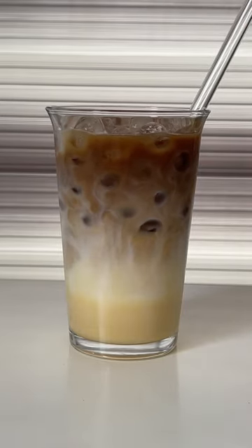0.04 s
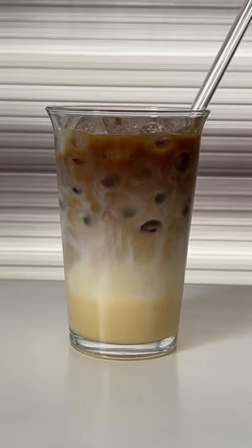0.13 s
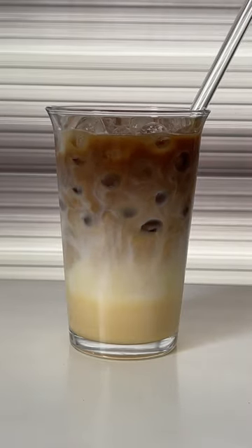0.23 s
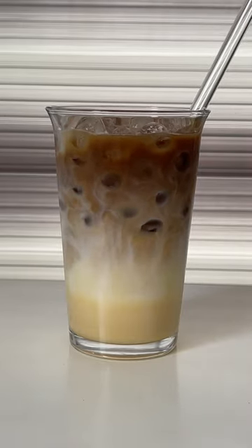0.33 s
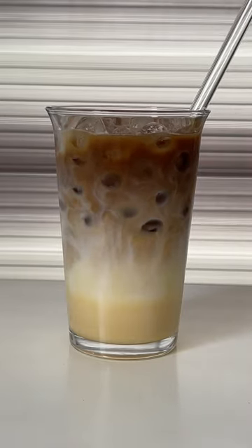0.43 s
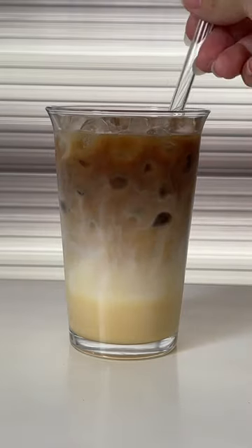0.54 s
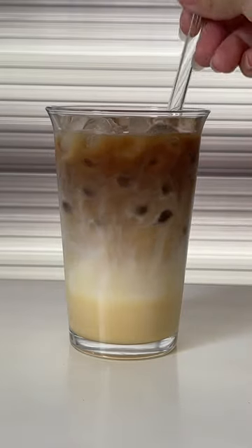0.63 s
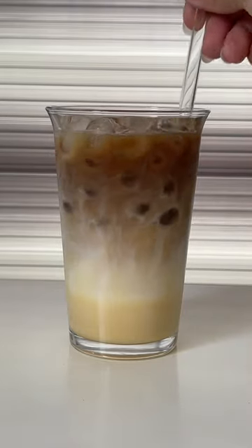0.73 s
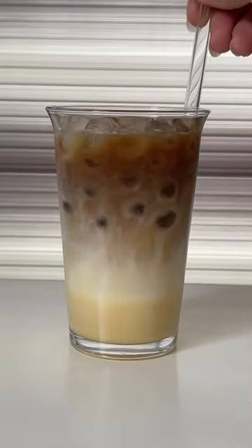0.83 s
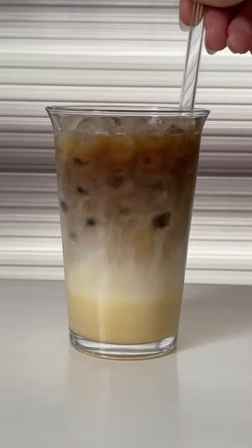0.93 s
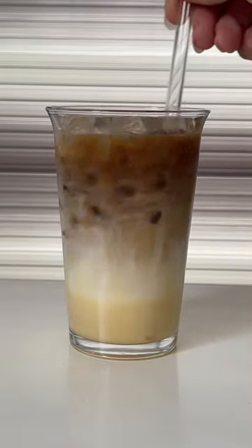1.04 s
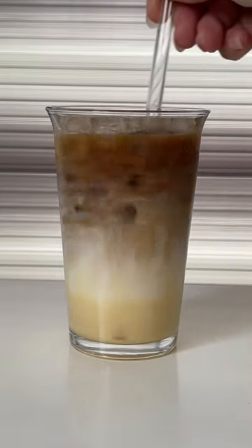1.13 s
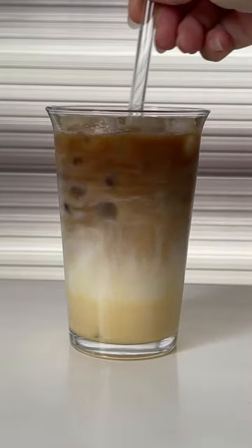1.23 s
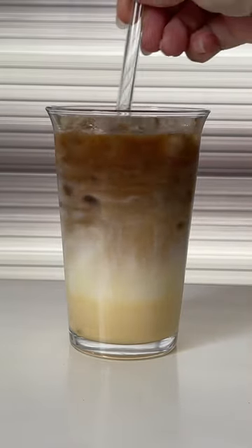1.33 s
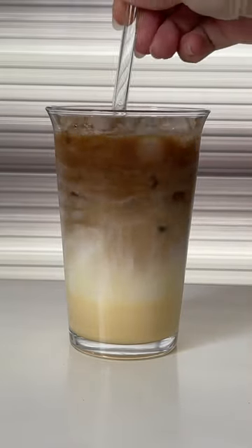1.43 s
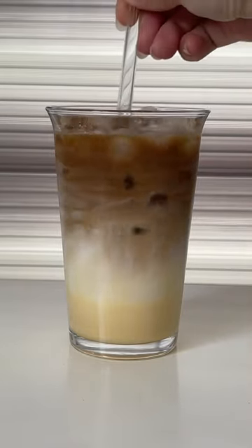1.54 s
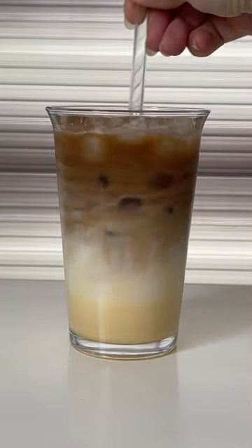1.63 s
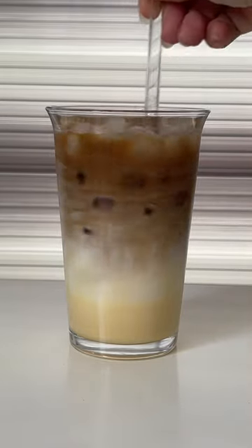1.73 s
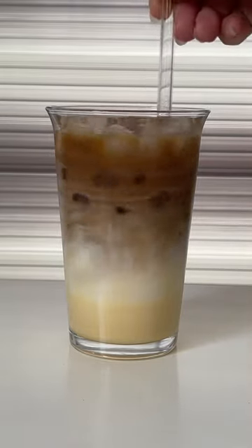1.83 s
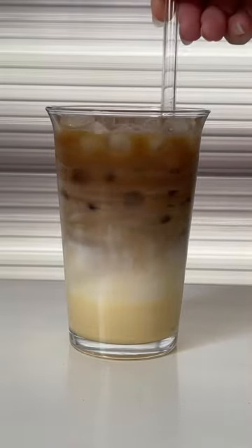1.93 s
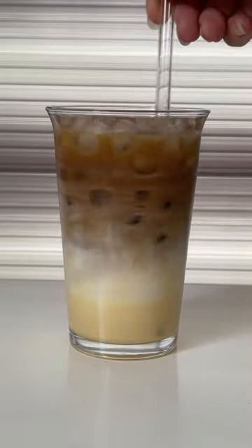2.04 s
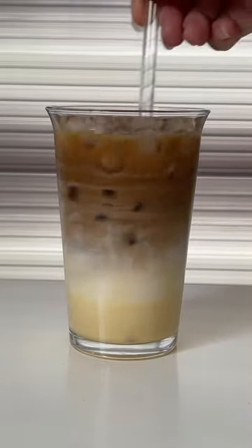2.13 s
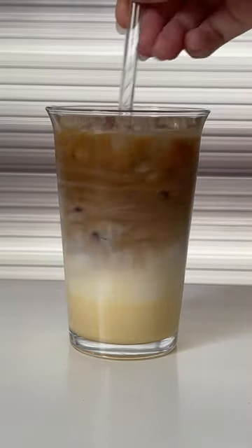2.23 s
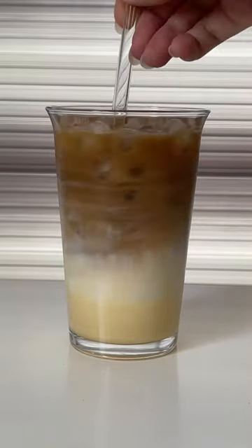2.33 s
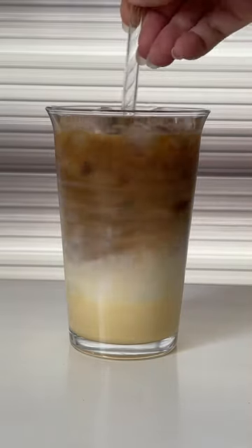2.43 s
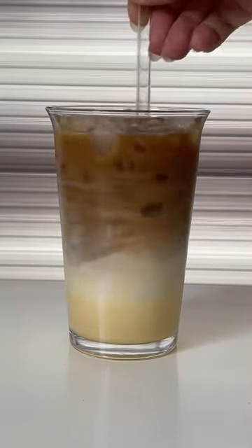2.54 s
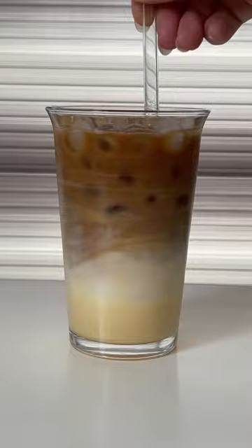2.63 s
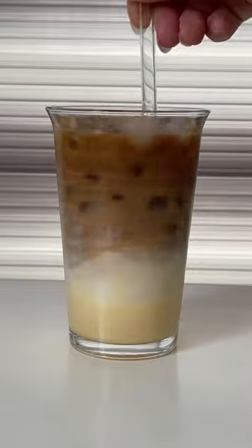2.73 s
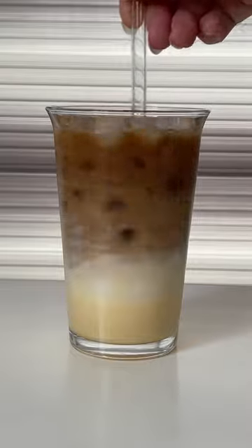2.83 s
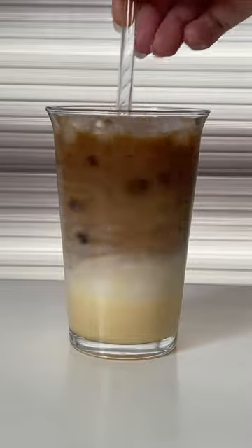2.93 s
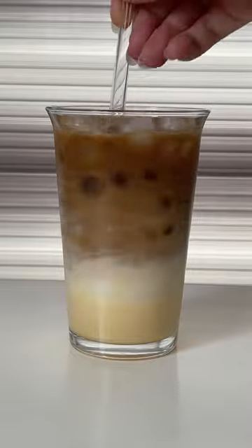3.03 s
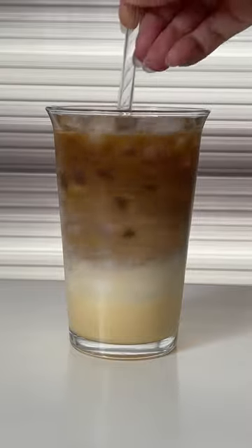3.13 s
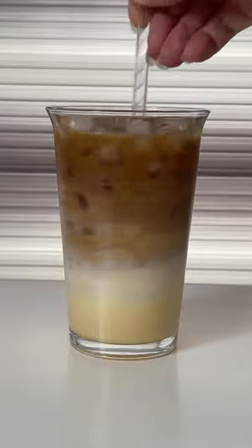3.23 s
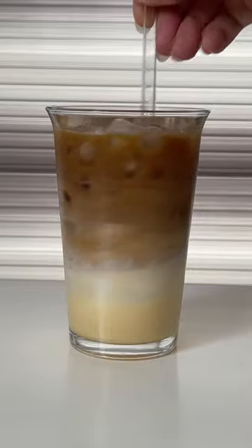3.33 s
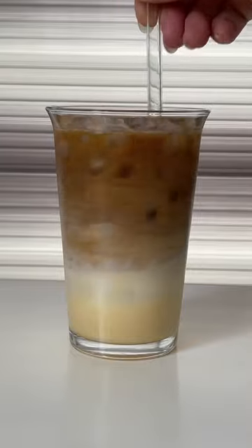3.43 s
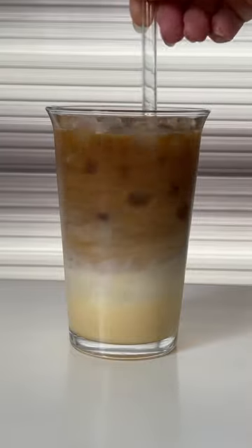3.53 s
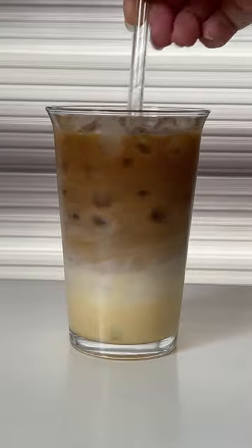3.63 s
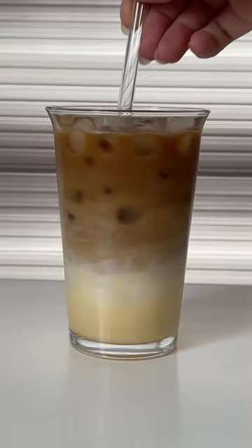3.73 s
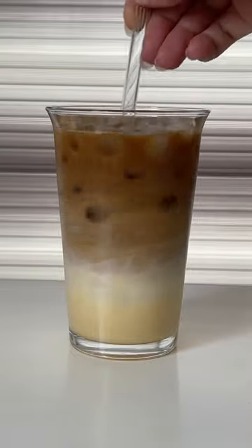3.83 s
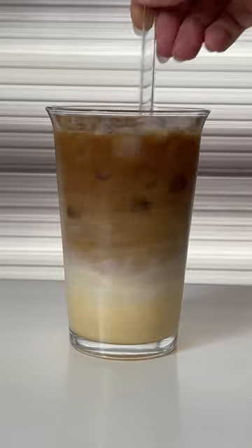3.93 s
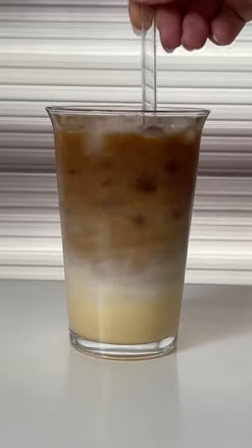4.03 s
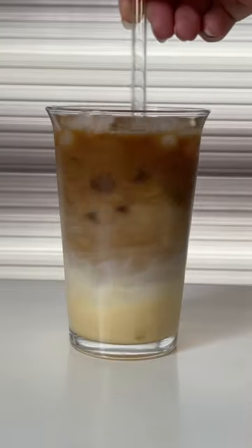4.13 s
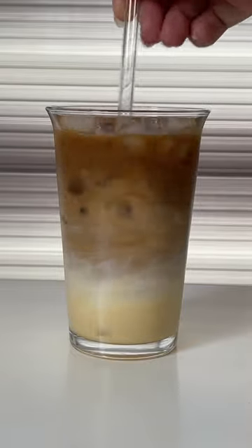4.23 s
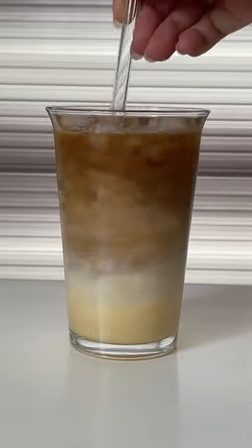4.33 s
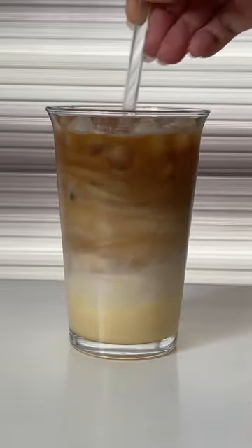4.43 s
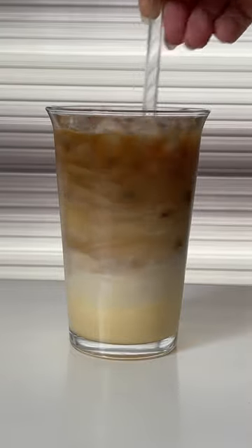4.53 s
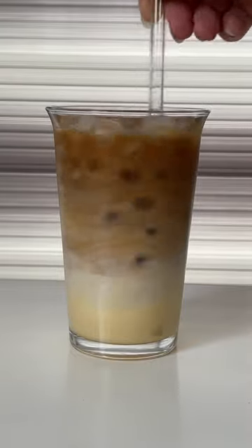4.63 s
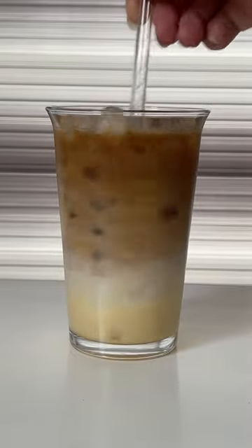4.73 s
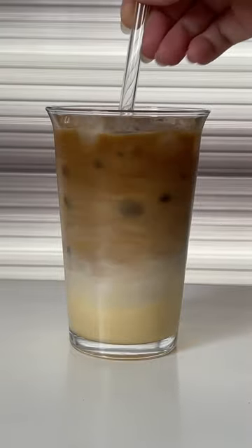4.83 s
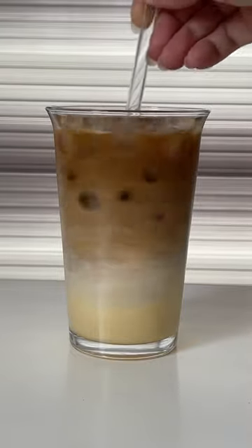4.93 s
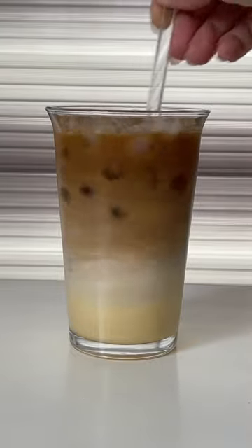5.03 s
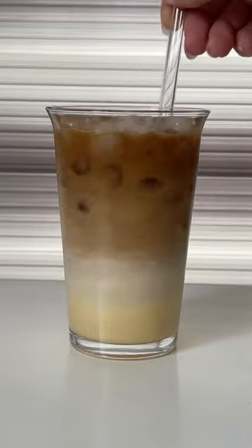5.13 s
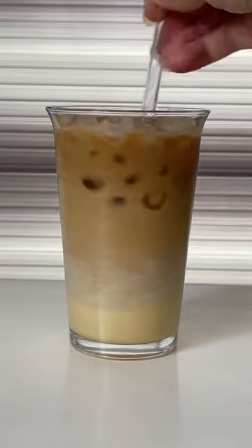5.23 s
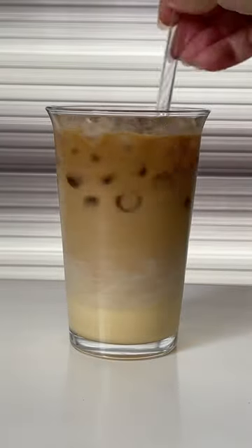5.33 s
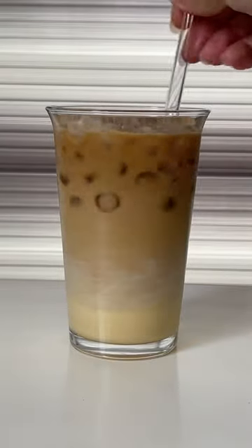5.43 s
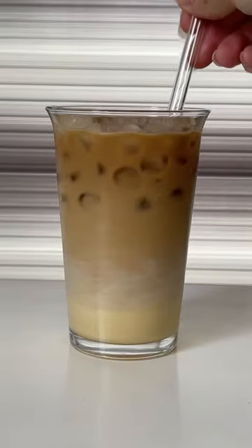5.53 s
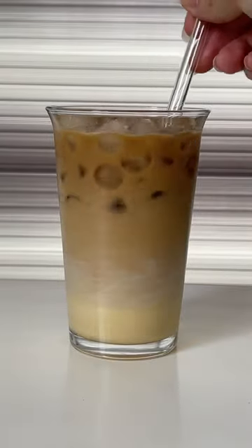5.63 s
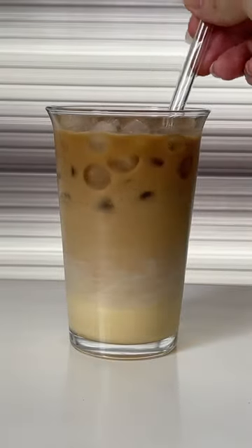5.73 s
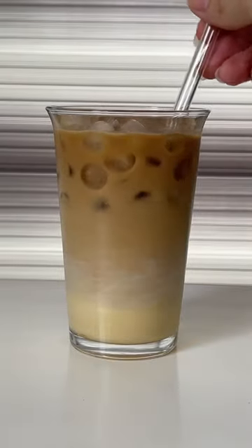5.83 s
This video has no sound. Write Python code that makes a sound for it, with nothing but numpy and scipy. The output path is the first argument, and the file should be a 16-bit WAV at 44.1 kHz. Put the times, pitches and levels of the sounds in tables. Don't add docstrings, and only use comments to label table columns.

```python
import sys
import numpy as np
from scipy import signal
from scipy.fft import rfft, irfft, next_fast_len
from scipy.io import wavfile
from scipy.ndimage import uniform_filter1d

SR = 44100
rng = np.random.default_rng(int(sys.argv[2]) if len(sys.argv) > 2 else 0)


def how_loud(loudness_db):
    steps = np.asarray(loudness_db, float) / 20
    return 10 ** steps


def put_to_file(sound):
    columns = np.atleast_2d(sound).T
    safe = np.clip(columns, -1, 1)
    whole_steps = np.round(safe * 32767)
    wavfile.write(sys.argv[1], SR, whole_steps.astype(np.int16))


N = 260190
TIME = np.arange(N) / SR


def evened(x):
    return x / np.sqrt(np.mean(x ** 2) + 1e-20)


def read(points, hz):
    f, value = np.transpose(points)
    return np.interp(np.log(hz + 1), np.log(f + 1), value)


def add(mix, s, sound):
    part = mix[round(s * SR):][:len(sound)]
    part += sound[:len(part)]


def noise(points, channels=1):
    size = next_fast_len(N)
    colour = how_loud(read(points, np.fft.rfftfreq(size, 1 / SR)))
    white = rng.standard_normal((channels, size))
    return evened(irfft(rfft(white) * colour, size)[:, :N])


def hard(x, hz=1250):
    return signal.sosfilt(signal.butter(3, hz, "high", fs=SR, output="sos"), x)


def ring(hz, db, t60, size=2600):
    t = np.arange(size) / SR
    swell = 1 - np.exp(-t * hz / 1.3)
    return how_loud(db - 60 * t / t60) * swell * np.sin(2 * np.pi * hz * t)


def struck(modes, count, detune=0.011):
    out = 0
    for hz, db, t60 in modes:
        pitch, weight, damping = rng.standard_normal((count, 3)).T[:, :, None]
        out = out + ring(hz * (1 + detune * pitch), db + 3.2 * weight, t60 * np.exp(.25 * damping))
    return out


# (frequency [Hz], level [dB], decay t60 [s])
ICE = [(2250, -6, .005), (2750, -3, .005), (3300, -2, .004), (3800, -4, .004), (4480, -4, .007),
       (5250, -5, .005)]


def ice(hz, body, t60):
    out = ring(hz[:, None], 0, t60) + body * struck(ICE, len(hz), 0.064)
    out[:, 0] += 0.6
    return out


def knocks(when, levels_db, rings):
    lead = .006
    out, t = np.zeros(N), np.arange(1300) / SR - lead
    shape = (len(when), len(t))
    grit, chance, size = rng.standard_normal(shape), rng.random(shape), rng.standard_normal(shape)
    contact = 0.16 * grit * np.exp(np.minimum(t / 0.00015, -t / 0.001))
    contact[:, round(lead * SR)] += 1
    grazes = (chance < 700 / SR) * size
    contact = hard(contact + 0.17 * grazes * np.exp(np.minimum(t / 0.00037, -t / 0.005)))
    for group, db in zip(rings, levels_db):
        sounds = signal.fftconvolve(group[:, :1800], contact, axes=1)
        for s, level_db, sound in zip(when, db, sounds):
            add(out, s - lead + 0.00033, how_loud(level_db) * sound / abs(sound).max())
    return out


# (frequency [Hz], density [dB per Hz])
AIR = [(65, -34), (110, -12.5), (380, -18.5), (484, -23.5), (591, -25.5), (3440, -41), (4730, -42.5),
       (13100, -34.5)]
AIR_DB = -77


def air():
    ports = noise(AIR, channels=2)
    return how_loud(AIR_DB) * (ports[0] + .3 * ports)


# (time [s], level [dB])
RUMBLE = [(0.0, -72.5), (1.31, -75), (1.48, -64), (1.56, -71.5), (4.34, -74), (4.58, -54.5), (4.67, -66),
          (4.91, -53), (5.6, -72.5), (5.65, -62.5), (5.9, -74)]


def rumble():
    low = noise([(15, -57), (30, -36), (40, 7.5), (58, 7.0), (90, 1.0), (150, -9.5), (300, -30.5)])[0]
    s, db = np.transpose(RUMBLE)
    return low * how_loud([[-.4], [.4]]) * how_loud(np.interp(TIME, s, db))


# (time [s], level [dB], start frequency [Hz], end frequency [Hz])
TICK = (0.417, -49, 11300, 7600)


def tick():
    s, db, from_hz, to_hz = TICK
    out, hz = np.zeros(N), np.geomspace(from_hz, to_hz, 420)
    chirp = np.sin(2 * np.pi * np.cumsum(hz) / SR)
    add(out, s, how_loud(db) * np.hanning(420) * chirp * rng.uniform(0.78, 1, 420))
    return out


# (peak time [s], jostle level [dB], rise [s], fall [s]), rise and fall over SWING_DB
STROKES = [(.5, -52, .02, 0.028), (.88, -62, 0.59, 0.13), (1.33, -72, 0.057, 0.33),
           (1.602, -47, 0.43, 0.14), (1.86, -58, 0.39, 0.13), (2.22, -51, 0.16, 0.29),
           (2.56, -57, 0.12, 0.067), (2.803, -55.5, 0.16, 0.077), (3.2, -53, 0.23, 0.24),
           (3.62, -58, 0.15, 0.19), (3.919, -47.5, 0.14, 0.26), (4.52, -45, 0.2, 0.21),
           (5.08, -45.5, 0.28, 0.15), (5.36, -53, 0.19, 0.041), (5.7, -59.5, 0.29, 0.19)]
SWING_DB, REST_DB = 10, -97
ROUND = 2.3


def stir_db():
    t = np.arange(0, N + 64, 64) / SR
    power = how_loud(2 * REST_DB)
    for s, db, rise, fall in STROKES:
        away = np.maximum((s - t) / rise, (t - s) / fall)
        power = power + how_loud(2 * (db - SWING_DB * away ** ROUND))
    return np.interp(TIME, t, 10 * np.log10(power))


BRIGHTEN = 0.24


def jostle(per_s=750, spread_db=6.0):
    kinds = 24
    bumps = rng.exponential(1, N)
    size = how_loud(spread_db * np.minimum(bumps, 2.4)) * (rng.random(N) < per_s / SR)
    kind = rng.integers(0, kinds, N)
    taps = how_loud(-4.5) * struck(RIM, kinds) + how_loud(-6.5) * struck(STRAW, kinds)
    taps += how_loud(-8.5) * struck(WALL, kinds, 0.0893) + how_loud(0.5) * struck(ICE, kinds, 0.04)
    taps[:, 0] += 3.0
    contact = hard(rng.standard_normal((kinds, 200)) * np.exp(-((np.arange(200) - 60) / 9) ** 2))
    taps = signal.fftconvolve(taps[:, :1500], contact, axes=1)
    taps /= np.linalg.norm(taps, axis=1)[:, None]
    out = sum(signal.oaconvolve(size * (kind == k), taps[k])[:N] for k in range(kinds))
    slow = np.sqrt(uniform_filter1d(out ** 2, 7000) + 1e-12)
    treble, level_db = hard(out, hz=2600), stir_db()
    out = out + treble * (how_loud(BRIGHTEN * (level_db + 51.5)) - 1)
    return out / slow * how_loud(level_db) * how_loud(1.5)


# (frequency [Hz], density [dB per Hz])
SLOSH = [(53, -51), (90, -17.5), (184, -5), (333, -10.5), (442, -4.5), (610, -15.5), (950, -14.5),
         (1300, -6.5), (2200, -120)]
SLOSH_DB, SLOSH_FOLLOWS = -65.5, 0.81


def slosh():
    lumps = how_loud(3.0 * evened(uniform_filter1d(rng.standard_normal(N), 900)))
    common, apart = noise(SLOSH, channels=2)
    ports = common + 0.36 * np.outer([1, -1], hard(apart, hz=150))
    level_db = SLOSH_DB + SLOSH_FOLLOWS * (stir_db() + 59.0)
    return how_loud(-4.5) * ports * lumps * how_loud(level_db)


# (frequency [Hz], level [dB], decay t60 [s])
WALL = [(1685, 0.5, 0.023), (1436, -2.5, 0.012), (1870, -19, 0.0057), (1166, -13.5, 0.024)]
# (time [s], peak level [dB])
WALL_KNOCKS = [(0.5025, -49), (0.6074, -50), (0.662, -50), (0.9813, -48.5), (1.0854, -69), (1.2768, -50),
               (1.4252, -39.5), (1.511, -43), (1.5784, -42), (1.6447, -40), (2.195, -44), (2.2135, -37.5),
               (2.2724, -44), (2.459, -42.5), (2.6259, -53), (2.6534, -48.5), (2.7743, -44),
               (2.9741, -48.5), (3.038, -48.5), (3.1348, -44), (3.525, -56), (3.5466, -48.5), (3.7337, -47),
               (3.8621, -41), (3.9384, -44), (3.9567, -48), (4.0058, -39), (4.094, -47), (4.2662, -50),
               (4.283, -42.5), (4.4228, -43), (4.4777, -26.5), (4.5383, -23), (4.5995, -41), (4.6575, -46),
               (4.9576, -37), (4.9802, -43), (5.0905, -38.5), (5.103, -35.5), (5.1437, -42), (5.306, -52),
               (5.419, -54.5), (5.4994, -50), (5.6228, -43)]


def wall_knocks():
    s, db = np.transpose(WALL_KNOCKS)
    return knocks(s, [db], [struck(WALL, len(s))])


# (time [s], peak level [dB], pitch [Hz])
LARGE_CUBES = [(0.5051, -43, 2340), (0.658, -57, 2680), (0.739, -54, 2260), (0.7652, -40.5, 2120),
               (0.85, -48.5, 2220), (0.894, -49, 2340), (0.9231, -43.5, 2330), (0.984, -40, 2150),
               (1.0134, -42.5, 2600), (1.088, -49.5, 2220), (1.113, -51, 2790), (1.283, -43, 2510),
               (1.406, -46, 3100), (1.503, -48, 2620), (1.6188, -46, 3530), (1.6362, -36, 2640),
               (1.824, -54, 2730), (2.144, -50, 2600), (2.184, -42, 3170), (2.273, -40, 2880),
               (2.3157, -34.5, 3700), (2.3403, -38, 3930), (2.4589, -42, 2450), (2.5496, -39.5, 2610),
               (2.6266, -47, 2210), (2.7038, -46, 2120), (2.771, -45, 2160), (2.953, -48.5, 2340),
               (3.077, -42, 2180), (3.189, -40, 3700), (3.287, -38.5, 2240), (3.412, -41.5, 2200),
              (3.5236, -43.5, 1970), (3.561, -40, 2520), (3.651, -44, 3080), (3.858, -38, 3450),
              (3.9084, -33.5, 2300), (3.9574, -41, 2750), (4.0046, -41, 2300), (4.2814, -45, 2150),
              (4.3042, -32, 2540), (4.38, -41, 3600), (4.422, -44, 3430), (4.4737, -33, 2020),
              (4.52, -29, 2680), (4.5407, -32, 2720), (4.6074, -43, 3000), (4.9827, -41, 2720),
              (5.086, -36, 1960), (5.1, -36, 2680), (5.142, -34.5, 2290), (5.2464, -48, 2510),
              (5.2816, -40, 2320), (5.501, -46.5, 2350), (5.6225, -43.5, 3320)]


def cube_knocks():
    s, db, hz = np.transpose(LARGE_CUBES)
    return knocks(s, [db + 5.5], [ice(hz, body=0.55, t60=0.0035)])


# (time [s], peak level [dB], pitch [Hz])
THUDS = [(0.51, -61, 443), (0.705, -51, 440), (1.347, -47, 459), (1.481, -53.5, 465), (1.554, -66, 426),
         (1.624, -52, 433), (1.653, -45, 470), (2.145, -52.5, 506), (2.185, -56, 454), (2.284, -66, 446),
         (2.552, -53, 448), (2.967, -57.5, 435), (3.042, -56.5, 456), (3.093, -58, 486), (3.139, -50, 442),
         (3.192, -55, 460), (3.248, -48, 452), (3.287, -52.5, 456), (3.342, -52, 442), (3.908, -42.5, 516),
         (3.958, -54.5, 497), (4.339, -58, 470), (4.434, -47, 428), (4.483, -45.5, 433), (4.545, -46, 426),
         (4.608, -50, 470), (4.667, -55, 460), (4.748, -56, 445), (4.788, -62, 460), (4.902, -49, 452),
         (4.951, -50, 430), (4.999, -26, 457), (5.151, -32.5, 460), (5.25, -52, 450), (5.313, -54, 475),
         (5.346, -40.5, 459), (5.452, -63, 455), (5.626, -44, 465)]
CRUNCH_DB, PUSH_DB = 1.5, -5


def thuds():
    out, t = np.zeros(N), np.arange(2600) / SR
    dull = signal.butter(2, [550, 1350], "band", fs=SR, output="sos")
    crunch = signal.sosfilt(dull, rng.standard_normal((len(THUDS), len(t))))
    landing = (1 - np.exp(-t / 0.004)) * (0.3 + 0.7 / (1 + (t / 0.015) ** 6))
    for (s, db, hz), (a, b), grit in zip(THUDS, rng.standard_normal((len(THUDS), 2)), crunch):
        body = ring(hz, 0, 0.075) + ring(hz * 1.09, -5, 0.06)
        body += ring(hz * 0.66, -12, 0.04) + ring(hz * 1.51, -10 + 2 * a, 0.03)
        body += how_loud(CRUNCH_DB - 60 * t / 0.078) * grit
        push = ring(190 * (1 + 0.11 * b), PUSH_DB, 0.045)
        add(out, s - .0035, how_loud(db + 4.5) * (body + push) * landing)
    return out


# (frequency [Hz], level [dB], decay t60 [s])
RIM = [(7376, -4.5, 0.0097), (7550, -4.5, 0.0081), (7930, -2.5, 0.0067), (8120, -9.5, 0.011),
       (7134, -19.5, 0.0025), (6370, 3, 0.0014)]
STRAW = [(10897, 0, 0.004), (11130, -12.5, 0.0063), (10320, -3.5, 0.0042), (9770, -12.5, 0.0082)]
# (time [s], rim peak level [dB], straw level [dB])
RIM_CONTACTS = [(0.5067, -45.5, -58), (0.513, -57, -72), (0.517, -51, -70), (0.608, -46, -80),
                (0.626, -34.5, -45), (0.66, -31, -47), (0.664, -30.5, -42), (0.7392, -50, -70),
                (0.7657, -49, -75), (0.8096, -42.5, -68), (0.814, -45, -63), (0.849, -49, -65),
                (0.878, -41, -71), (0.8919, -34.5, -37.5), (0.903, -52, -71), (0.9237, -43, -61),
                (0.931, -46, -51), (0.9373, -42, -41), (0.983, -42.5, -55), (1.0148, -35, -39.5),
                (1.1256, -41.5, -49), (1.173, -48, -50), (1.269, -58, -66), (1.275, -36, -54),
                (1.281, -42, -62), (1.298, -38.5, -42), (1.3053, -37, -54), (1.354, -48, -56),
                (1.37, -39, -63), (1.3765, -35, -60), (1.417, -31.5, -45), (1.424, -32.5, -47),
                (1.4577, -38, -46), (1.47, -38, -42), (1.4825, -35, -59), (1.499, -39, -46),
                (1.503, -25.5, -36), (1.5129, -28, -35), (1.573, -36, -31), (1.5788, -36, -35),
                (1.609, -44, -56), (1.6244, -32, -46), (1.6295, -33, -44), (1.6362, -24.5, -27),
                (1.6425, -34, -37), (1.6463, -26, -25.5), (1.652, -32, -48), (1.67, -32, -40),
                (1.686, -36, -48), (1.7433, -33, -53), (1.746, -36, -51), (1.821, -28, -29.5),
                (1.8382, -31.5, -39), (1.8433, -34.5, -55), (1.8467, -40, -48), (2.056, -53, -72),
                (2.1145, -46, -64), (2.1282, -43, -63), (2.145, -47, -38.5), (2.1944, -40, -39.5),
                (2.2008, -36, -62), (2.212, -39.5, -40), (2.2753, -31, -48), (2.286, -44, -49),
              (2.3154, -35, -52), (2.332, -41, -40), (2.3686, -41, -63), (2.3744, -41.5, -67),
              (2.4274, -51, -66), (2.4588, -41, -46), (2.488, -42.5, -57), (2.4914, -46, -61),
              (2.541, -46, -56), (2.5484, -40, -43), (2.5818, -39, -57), (2.625, -42.5, -55),
              (2.666, -49, -70), (2.7055, -53, -63), (2.7174, -40.5, -44), (2.722, -45, -59),
              (2.774, -58, -65), (2.7901, -44, -74), (2.8048, -57, -70), (3.041, -38.5, -51),
              (3.06, -44, -61), (3.074, -40, -63), (3.078, -39, -41), (3.0924, -28, -39.5),
              (3.1296, -41, -58), (3.19, -41, -44.5), (3.2144, -38.5, -44), (3.229, -41, -55),
              (3.245, -37, -47), (3.26, -47, -64), (3.289, -42, -46), (3.336, -53, -52),
              (3.346, -39.5, -64), (3.443, -53, -75), (3.489, -41.5, -57), (3.524, -42, -44),
              (3.5482, -44, -48), (3.5595, -31.5, -42.5), (3.565, -45, -62), (3.593, -41.5, -53),
              (3.65, -37.5, -39), (3.727, -35.5, -44), (3.734, -33, -40), (3.827, -36, -39.5),
              (3.86, -31.5, -31), (3.8729, -35, -42), (3.8796, -34, -32), (3.908, -15.5, -17),
              (3.914, -35, -46), (3.9355, -31, -37), (3.9575, -26.5, -31), (3.9965, -34, -38),
              (4.0044, -20.5, -36), (4.0177, -32, -37), (4.027, -36, -55), (4.094, -42, -55),
                (4.167, -48, -47), (4.281, -32, -38), (4.2906, -30.5, -46), (4.3023, -26.5, -32.5),
           (4.3304, -37, -54), (4.338, -40, -41), (4.38, -39, -41), (4.4006, -37, -62), (4.4214, -32, -43),
           (4.4253, -27, -35), (4.4341, -35, -36), (4.4451, -31, -44), (4.467, -31, -41),
           (4.4782, -28.5, -30.5), (4.482, -28, -39), (4.4994, -29, -36), (4.5195, -21.5, -29),
           (4.538, -20, -16.5), (4.5435, -18, -34), (4.547, -23, -44), (4.554, -37, -30.5),
           (4.56, -35, -24), (4.5758, -26, -42), (4.6066, -32, -38), (4.7634, -40, -41.5),
           (4.8001, -40, -50), (4.805, -36.5, -45), (4.809, -37, -48), (4.8518, -40, -43),
           (4.876, -37, -50), (4.8949, -35, -28.5), (4.8979, -47, -45), (4.941, -37, -47),
           (4.9548, -27.5, -42), (4.96, -47, -26.5), (4.9786, -29, -33), (4.9832, -28, -32),
           (4.994, -38, -36), (5.005, -30, -37), (5.05, -23.5, -28), (5.099, -30, -34), (5.104, -29, -44),
           (5.1258, -47, -60), (5.14, -37, -39), (5.145, -35.5, -47), (5.173, -38, -60), (5.187, -42, -41),
           (5.2474, -31, -44), (5.2982, -35.5, -42.5), (5.307, -36, -53), (5.3563, -41.5, -63),
           (5.373, -36, -61), (5.3778, -38.5, -57), (5.419, -47, -52), (5.4381, -48, -60),
           (5.5114, -34.5, -47.5), (5.6333, -39, -55), (5.646, -39.5, -43), (5.81, -50, -70),
           (5.8304, -40, -45)]


def rim_knocks():
    s, db, straw_db = np.transpose(RIM_CONTACTS)
    rim = struck(RIM, len(s))
    rim[:, 0] += 1.0
    return knocks(s, (db + 6.0, straw_db + 8.0), (rim, struck(STRAW, len(s))))


# (time [s], peak level [dB], pitch [Hz])
GLINTS = [
    (0.6589, -56, 14600),
    (1.297, -74, 14800),
    (1.6362, -53, 13200),
    (1.8193, -60, 13500),
    (3.2171, -67, 13500),
    (4.0174, -63, 14300),
    (4.0322, -60, 14500),
    (4.3016, -68, 13300),
    (4.5366, -54, 13300),
    (4.895, -66, 13500),
]


def glints():
    out, t = np.zeros(N), np.arange(200) / SR
    pulse = np.sin(np.pi * np.minimum(t / 0.0025, 1)) ** 2
    for (s, db, hz), grit in zip(GLINTS, rng.standard_normal((len(GLINTS), 200))):
        rough = 1 + 1.6 * uniform_filter1d(grit, size=8)
        add(out, s, how_loud(db - 3.0) * rough * pulse * np.sin(2 * np.pi * hz * t))
    return out


# (time [s], peak level [dB])
SMALL_CUBES = [(0.6607, -28.5), (0.7113, -40.5), (0.891, -62), (0.941, -49), (1.0145, -53), (1.112, -44),
               (1.126, -55), (1.281, -41), (1.298, -46), (1.3523, -40.5), (1.385, -37), (1.418, -36.5),
               (1.427, -36.5), (1.4714, -34), (1.5036, -40), (1.581, -37.5), (1.646, -33.5), (1.668, -36),
               (2.026, -47), (2.114, -42.5), (2.151, -39), (2.2124, -42), (2.3164, -42), (2.473, -41.5),
               (2.5465, -59), (2.7183, -43), (2.773, -39),
               (2.9626, -49.5), (3.0779, -46.5), (3.1566, -43), (3.649, -43.5), (3.7795, -43),
              (3.8499, -37.5), (3.8725, -33), (4.0054, -33), (4.097, -40.5), (4.289, -38), (4.4254, -29),
              (4.5191, -45), (4.5371, -57), (4.559, -34), (4.605, -36), (4.7561, -35.5), (4.8954, -33.5),
              (4.942, -35.5), (4.961, -30.5), (4.9808, -37), (5.306, -40.5), (5.356, -46.5), (5.4194, -48),
              (5.498, -46.5), (5.5257, -45.5), (5.6448, -38), (5.739, -43.5), (5.7697, -50), (5.81, -46)]
CHIP_HZ, CHIP_SCATTER = 4650, 0.011


def chip_clicks():
    s, db = np.transpose(SMALL_CUBES)
    hz = CHIP_HZ * (1 + CHIP_SCATTER * rng.standard_normal(len(s)))
    return knocks(s, [db + 7.0], [ice(hz, body=0.22, t60=0.009)])


# (time [s], peak level [dB])
CHIPS_BETWEEN = [(1.4551, -36), (1.4823, -37), (1.653, -32), (1.8946, -53), (2.144, -36), (2.226, -38),
                 (2.2868, -34.5), (2.6524, -39.5), (2.8367, -43), (3.4979, -44), (3.7322, -37),
                 (3.884, -31.5), (3.9376, -33), (3.9948, -33), (4.0185, -34), (4.147, -43.5),
                 (4.229, -44.5), (4.5515, -29), (4.587, -32), (4.6624, -32.5), (5.014, -34.5), (5.106, -30),
                 (5.1144, -38), (5.3165, -39)]


def dry_ticks():
    s, db = np.transpose(CHIPS_BETWEEN)
    return knocks(s, [db + 1.5], [ice(np.full(len(s), CHIP_HZ), body=1.2, t60=0.0022)])


# (time [s], pitch [Hz], level [dB])
GULP = [
    (1.86, 348, -76),
    (1.89, 297, -72),
    (1.93, 221, -63),
    (1.96, 91, -65.5),
    (2.02, 80, -66),
    (2.05, 70, -78),
]


def gulp():
    s, hz, db = np.transpose(GULP)
    waver = 0.87 + 0.96 * evened(uniform_filter1d(rng.standard_normal(N), size=500))
    tone = np.sin(2 * np.pi * np.cumsum(np.interp(TIME, s, hz)) / SR)
    return how_loud(np.interp(TIME, s, db, -200, -200)) * waver * tone


def kitchen(x, t60, first):
    out, length = 0, 7000
    for turn in range(3):
        taps = rng.choice([-1., 1.], (2, length)) * (rng.random((2, length)) < .1)
        taps *= how_loud(-60 * np.arange(length) / SR / t60) * (np.arange(length) > first)
        taps[1] = taps[0] + hard(taps[1] - taps[0], hz=2500)
        taps /= np.linalg.norm(taps[0])
        share = np.sqrt(2 / 3) * np.cos(2 * np.pi * (TIME * 3.0 + turn / 3))
        out = out + signal.oaconvolve((x * share)[None], taps, axes=1)[:, :N]
    return out


def scene():
    stirring = TIME > GAPS[0][1]
    glass = tick() + jostle() * stirring + wall_knocks() + cube_knocks() + thuds()
    glass = glass + rim_knocks() + chip_clicks() + dry_ticks()
    counter = how_loud(-13) * kitchen(glass, t60=.012, first=12)
    room = how_loud(-17) * kitchen(glass, t60=.13, first=200)
    return glass + counter + room + air() + rumble() + slosh() * stirring + gulp()


def roll_off(x):
    return signal.sosfilt(signal.butter(12, 15500, fs=SR, output="sos"), x)


# (frequency [Hz], phase [rad])
PORTS = [(0, 0), (2100, 0), (4050, 0.7), (4650, 1.9), (5170, 4.9), (5600, 6.2), (6200, 6.4), (6460, 6.9),
         (8440, 9.1), (9560, 9.7), (11000, 11.2), (11800, 11.8), (12800, 11.9)]
# (frequency [Hz], gain [dB])
CAPSULE = [(5100, 0), (5900, -5), (6900, 0), (11000, 0), (11700, -9), (12400, -24), (13300, -56),
           (20000, -80)]
# (start [s], end [s])
GAPS = [
    (0.486, 0.4996),
    (5.27, 5.281),
]


def record(dry):
    size = next_fast_len(N + 2000)
    hz = np.fft.rfftfreq(size, 1 / SR)
    capsule = how_loud(read(CAPSULE, hz))
    lag = np.exp(-1j * np.outer([0, 1], read(PORTS, hz)))
    out = irfft(rfft(dry, size) * capsule * lag, size)[:, :N]
    out = out + glints()
    for start, end in GAPS:
        out = out * np.clip(np.maximum(start - TIME, TIME - end) / 0.007, 0, 1)
    return roll_off(out)


dry = scene()
out = record(dry)
put_to_file(out)
```